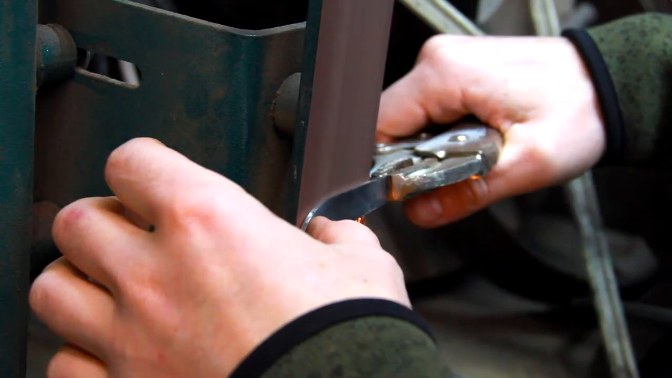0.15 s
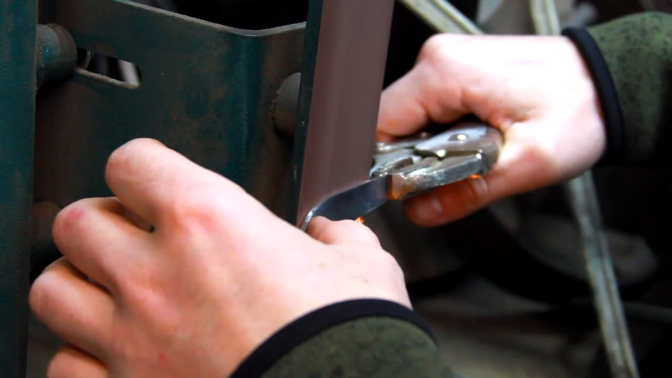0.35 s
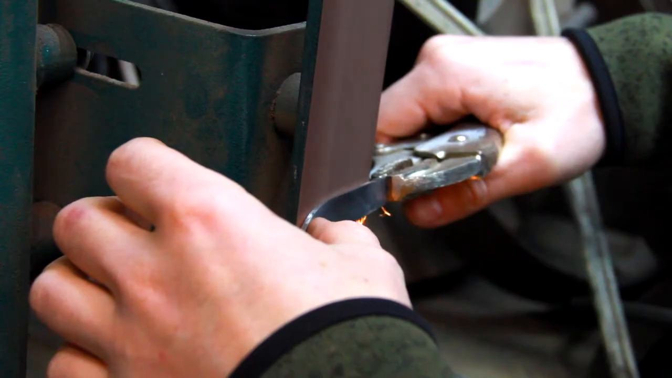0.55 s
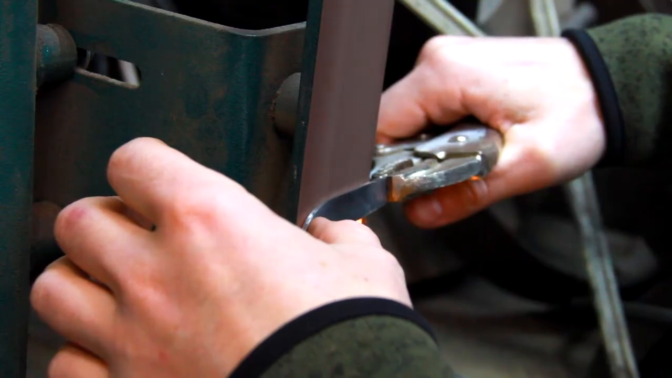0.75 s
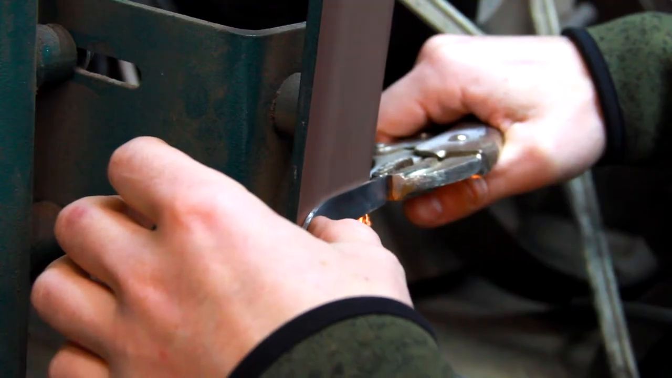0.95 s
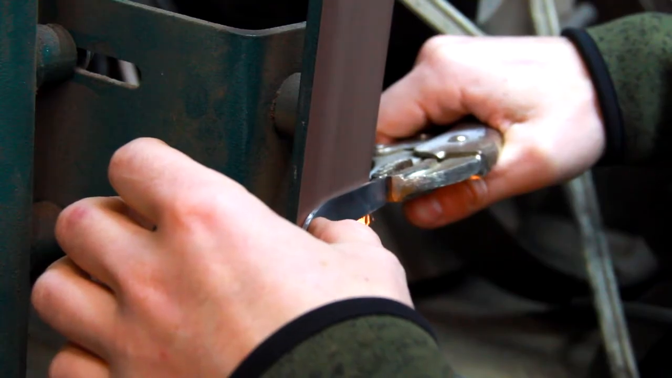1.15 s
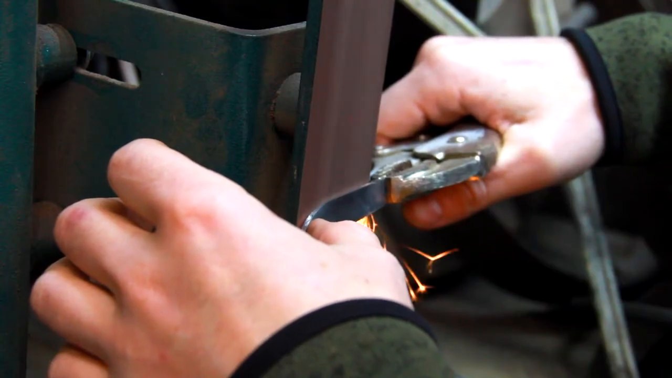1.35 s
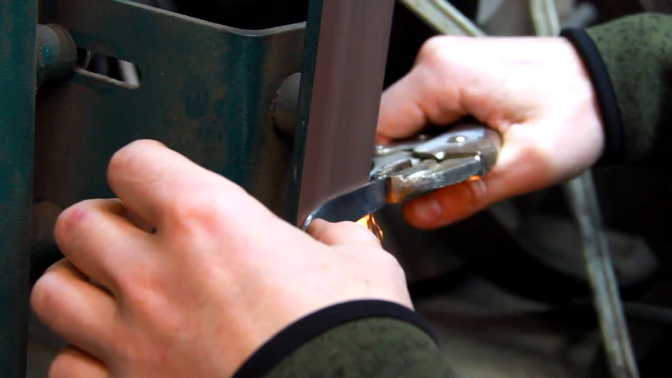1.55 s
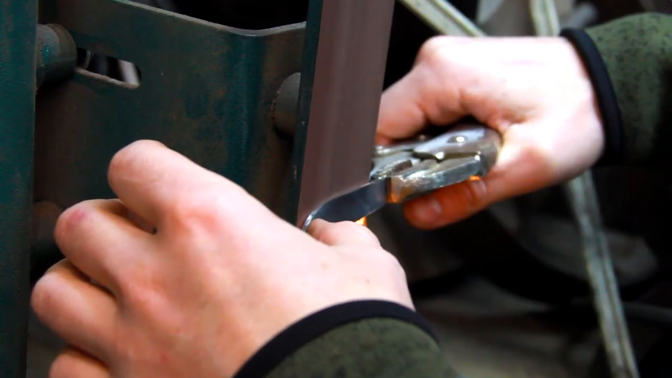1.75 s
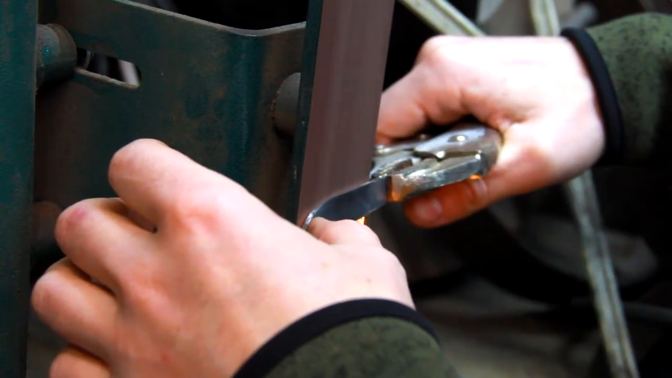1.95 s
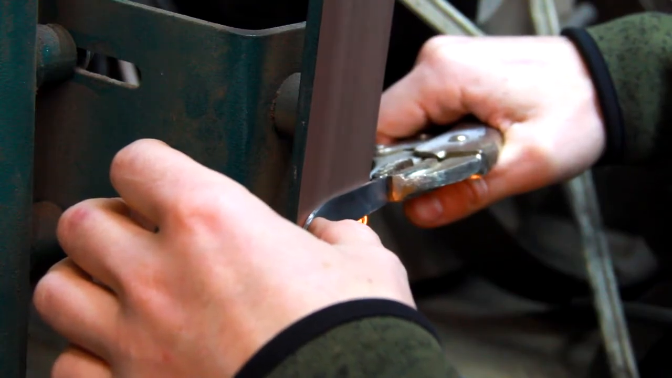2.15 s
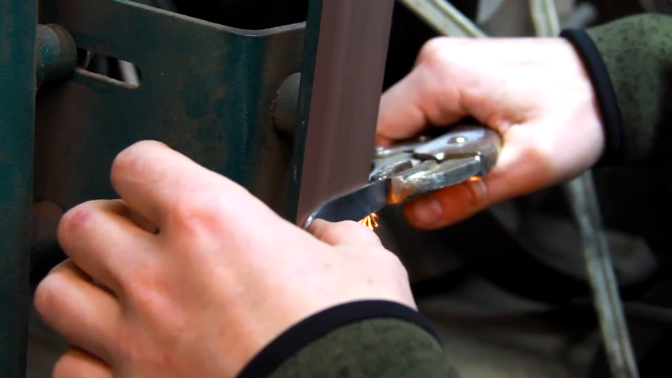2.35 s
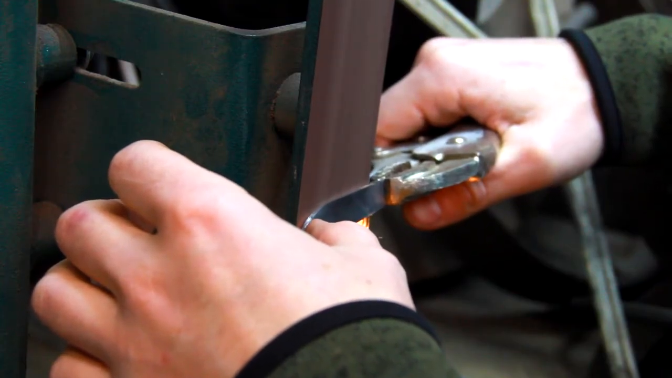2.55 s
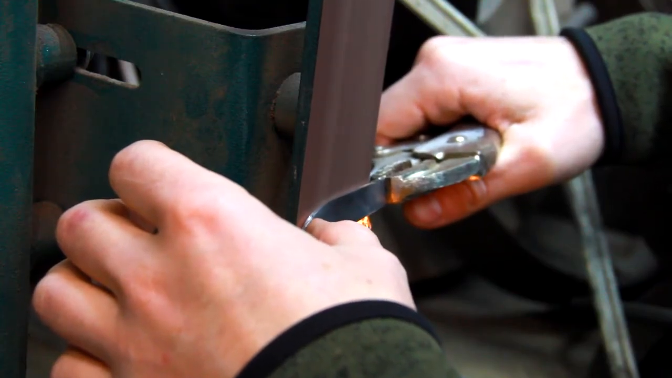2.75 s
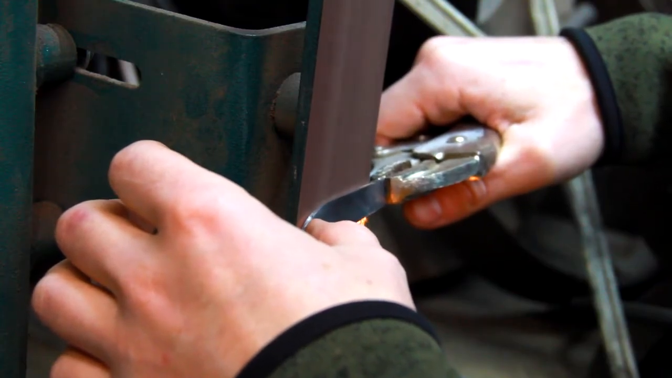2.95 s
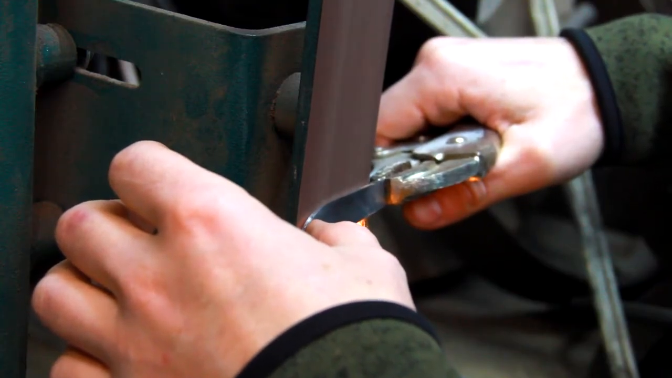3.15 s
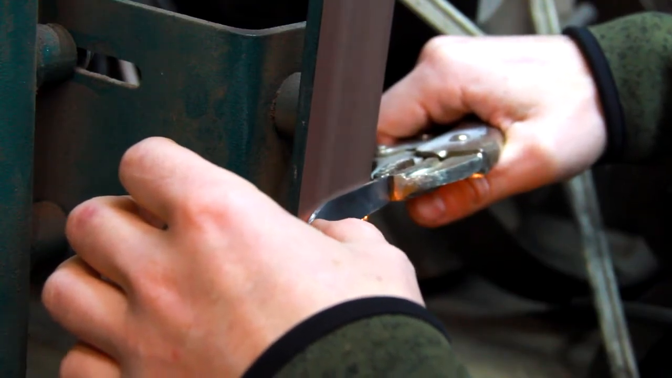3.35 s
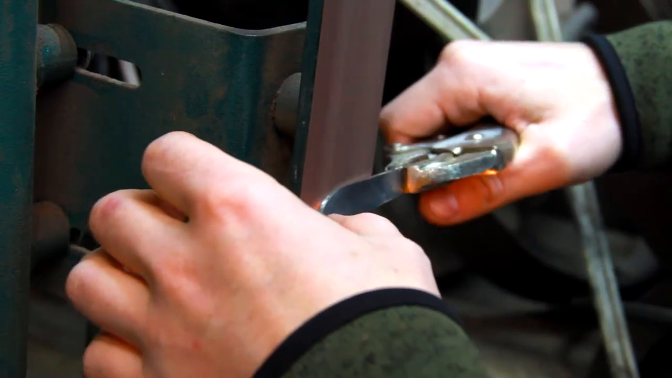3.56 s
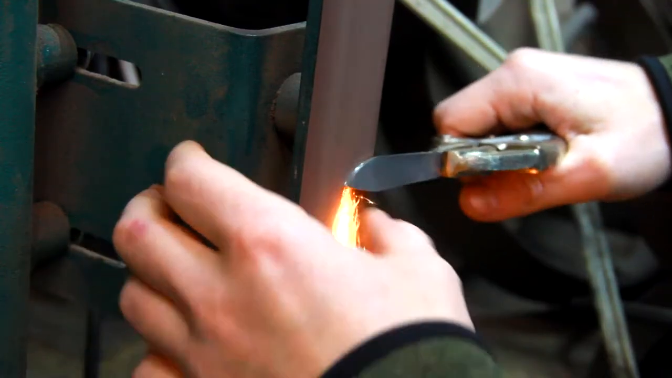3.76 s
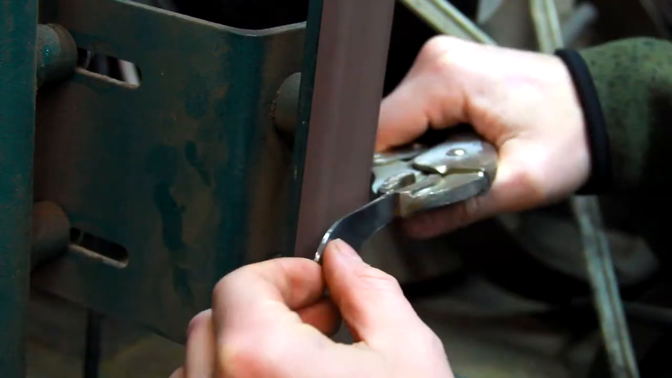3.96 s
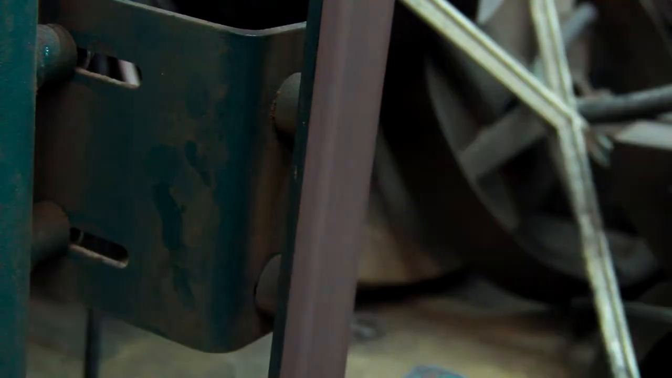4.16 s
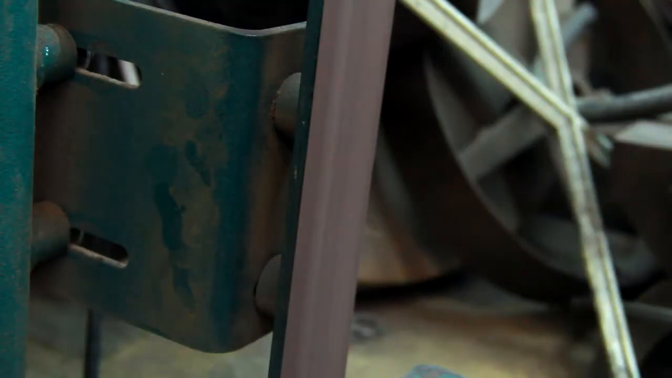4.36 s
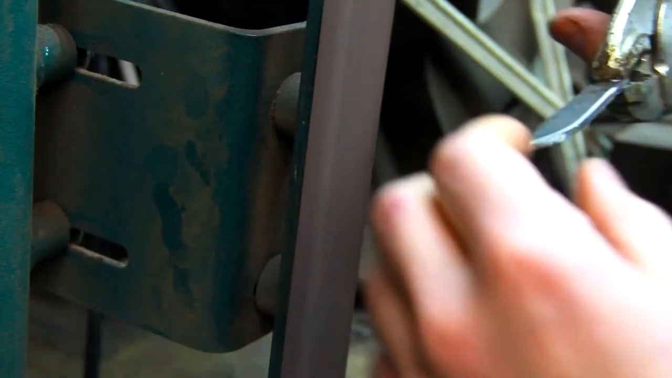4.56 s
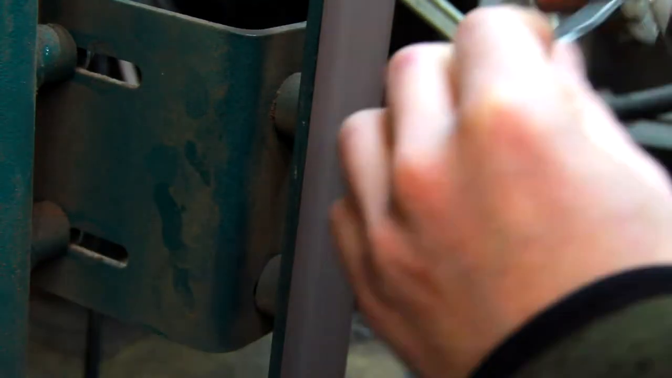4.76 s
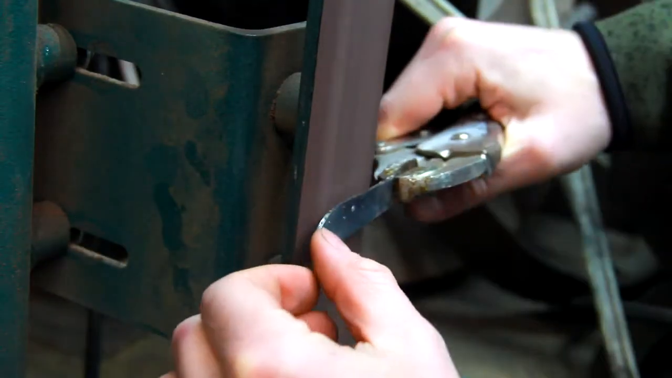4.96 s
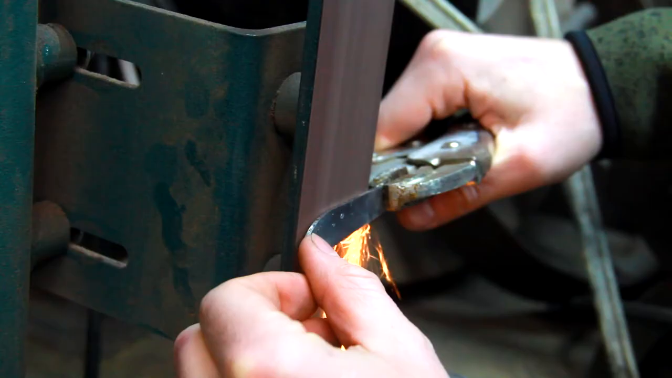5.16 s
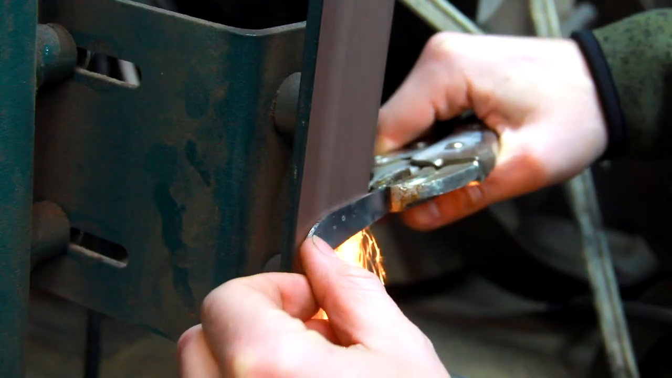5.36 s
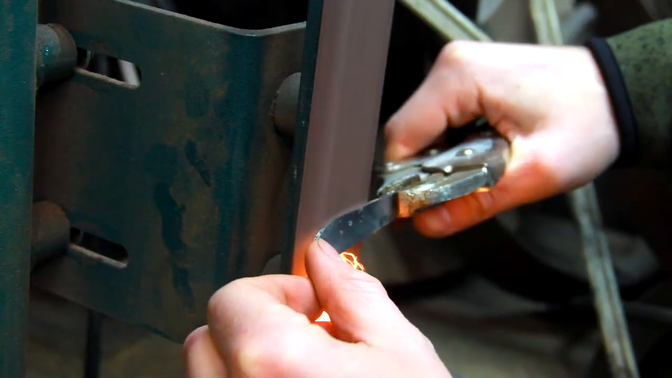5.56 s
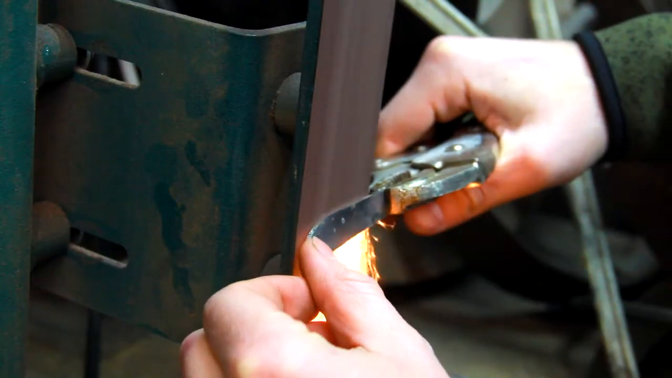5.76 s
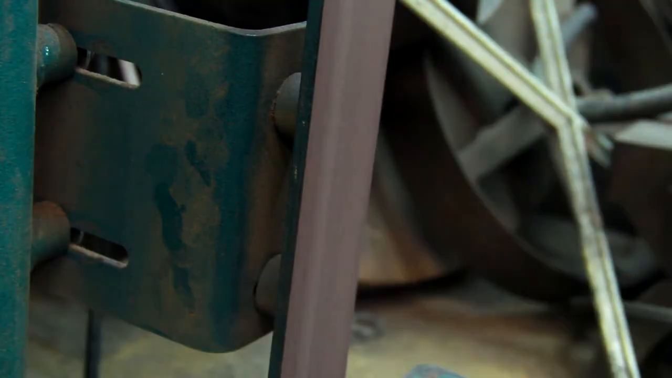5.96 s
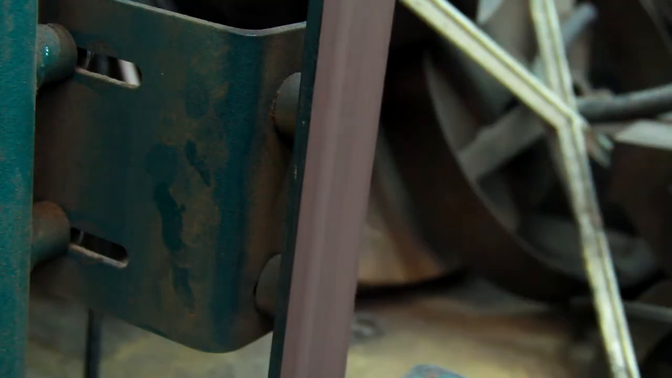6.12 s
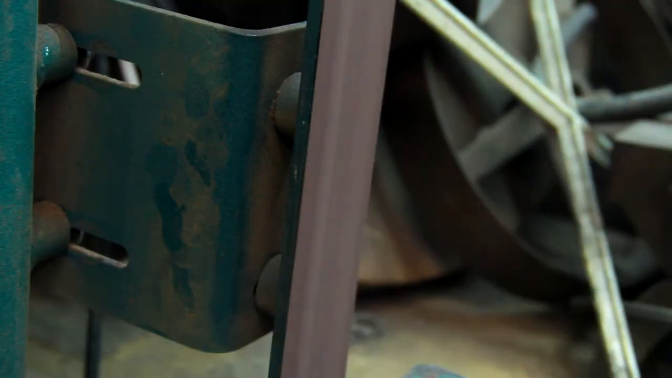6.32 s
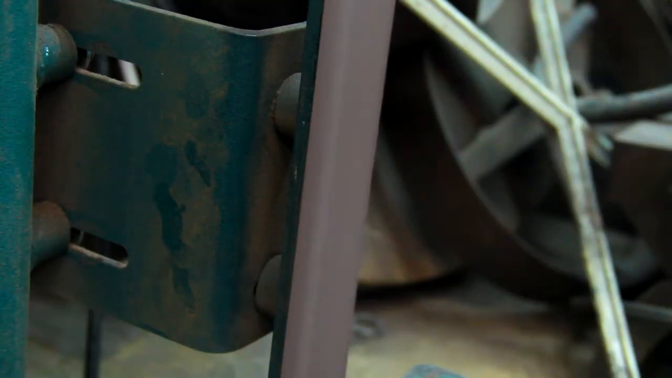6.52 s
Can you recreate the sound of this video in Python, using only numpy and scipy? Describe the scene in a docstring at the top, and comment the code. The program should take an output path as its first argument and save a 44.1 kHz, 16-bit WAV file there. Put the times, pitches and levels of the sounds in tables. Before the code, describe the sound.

A belt grinder runs under load, with low rumble, bright gritty hiss, metallic ringing and a clacking double knock at each belt lap. A hard cut turns it into a high whistle and harsh fused buzz. The buzz drops away when the blade leaves the belt, a tiny tick passes, then two firm presses follow. Close, dry, centred microphone.

```python
"""A small steel blade is ground on a belt grinder, close to the microphone. First, at natural speed, sine tones
make the motor's hum and whine, and shaped noise the frame's rumble, the grit's hiss and the ringing blade.
A double knock, noise in short pulses, returns each time the belt's splice passes under the blade.
Halfway, the sound jumps to fast-forward: the machine runs ten times faster, whistling and buzzing.
The blade is then lifted, a faint tick is heard while it is off the belt, and it is put back."""
import sys
import numpy as np
from scipy import signal
from scipy.fft import rfft, irfft
from scipy.io import wavfile

SR = 44100
rng = np.random.default_rng(int(sys.argv[2]) if len(sys.argv) > 2 else 0)


def store_pcm(level_fs):
    """Save levels as 16-bit WAV."""
    pcm = np.round(np.clip(level_fs, -1, 1) * 32767).astype(np.int16)
    wavfile.write(sys.argv[1], SR, np.atleast_2d(pcm).T)


N = 290619
TIME = np.arange(N) / SR  # seconds
BINS = np.fft.rfftfreq(N, 1 / SR) + 1e-3  # Hz, kept just above zero for the logarithm

# magnetic hum: (multiple of the mains frequency, level [dB])
HUM_LINES = [(1, -74.5), (2, -55.5), (4, -69), (6, -70), (8, -73)]
# fan, bearings and rotor slots: (multiple of the shaft rate, level before the whine trim [dB])
SHAFT_LINES = [(1, -101), (2, -82), (3, -73.5), (5, -66.5), (7, -80.5), (8, -69.5), (11, -69), (12, -70.5),
               (13, -69), (14, -79), (15, -72), (16, -71), (18, -79), (20, -82.5), (21, -72.5), (22, -71.5),
               (23, -72.5), (24, -76.5), (25, -73), (26, -75.5), (27, -71.5), (28, -65.5), (29, -74),
               (30, -77.5), (32, -73.5), (34, -63.5), (36, -75.5), (38, -63.5), (39, -70), (40, -73.5),
               (41, -83.5), (42, -75.5), (44, -74.5), (46, -78.5)]
# frame and idling belt: (frequency [Hz], level before the rumble trim [dB per Hz])
RUMBLE_SPECTRUM = [(10, -120), (38, -111), (52, -94), (72, -99), (92, -81.5), (110, -84.5), (140, -77.5),
                   (168, -82.5), (230, -75), (262, -80), (320, -73.5), (430, -87), (560, -90), (900, -89.5),
                   (1200, -88.5)]
# grit cutting steel: (frequency [Hz], relative level [dB])
GRIT_SPECTRUM = [(30, -63), (200, -14.5), (450, -9), (900, -14.5), (1200, -2), (1600, -19.5), (2400, -7.5),
                 (3200, 1), (4400, -4), (6500, -3.5), (7700, 0.5), (10500, -0.5), (13000, -5.5),
                 (15500, -10)]
# blade resonances: (frequency [Hz], width [Hz], relative level [dB])
BLADE_MODES = [(2065, 30, -0.5), (3070, 64, 3), (3114, 66, 7.5), (3264, 58, 7), (3415, 75, 1),
               (3635, 23, 3), (3880, 18, 4.5), (5253, 70, 7.5), (5384, 43, 7.5), (6020, 29, 9),
               (7220, 53, 4.5), (7700, 37, 4.5), (7900, 50, 2), (10700, 160, -4), (12500, 410, -4)]
# the platen behind the belt: (frequency [Hz], width [Hz], relative level [dB])
PLATEN_MODES = [(443, 14, -3), (487, 30, -3.5), (530, 9.8, 0), (630, 35, -14), (718.4, 12, 6),
                (823, 59, -6)]
# the pressed, damped blade as the splice knocks it: (frequency [Hz], width [Hz], relative level [dB])
KNOCK_MODES = [(700, 420, -10.5), (1222, 98, -3), (1648, 42.5, -0.5), (2049, 70, 3), (2415, 110, -2.5),
               (3004, 187, 6), (3744, 154, 1)]
# the edge scraping as it lands again: (frequency [Hz], width [Hz], relative level [dB])
SCRAPE_MODES = [(7900, 560, -2)]
# a faint tick: (time [s], decay [s], level before colouring [dB per Hz])
TICK_EVENT = (4.436, 0.01, -87.5)
# blows in each lap (leading end, trailing end, two bounces, a lump further along the belt):
# (lag at natural speed [s], relative knock level [dB], relative bright scrape level [dB])
LAP_BLOWS = [(0, 0, -9), (0.0083, 0.5, 1), (0.0142, -9, 1.5), (0.0193, -11, -1), (0.0678, -13.5, -28)]
# presses of the blade for the fast-forward: (start [s], end [s], edge pressure, tip pressure [1 = usual])
HAND_PRESSES = [(3.2, 3.579, 1.2, 0.96), (3.575, 3.858, .03, 0.84), (5.143, 5.596, 1.15, 0.76),
                (5.6, 5.745, .2, 0.65), (5.739, 5.885, 1.26, 0.86)]
# passes that catch the blade harder: (time [s], level above the usual [dB])
HARD_CATCHES = [(0.342, 0.3), (0.439, 1.5), (0.536, 2), (1.31, 2), (1.504, 1.5), (1.601, 2), (1.794, 1.5),
                (2.569, 2.5), (2.859, 1.5)]
# the blade's ring dips briefly: (time [s], half length [s], level change [dB])
RING_LEVEL_DIP = (1.55, 0.2, -1.5)

CUT_S = 3.272  # the jump to fast-forward
NORMAL, FAST = 1, 10  # playback speeds
# at natural speed: the unloaded shaft, the mains and the laps of the belt
SHAFT_HZ, MAINS_HZ, LAP_HZ = 29.78, 60, 10.328
SAG = 0.0055  # share of the shaft's speed lost at full load
FIRST_PASS_S = 0.0516  # the splice first comes round
# base strength of its knocks, their scatter, and the scatter of the belt's slip at natural speed
KNOCK_DB, KNOCK_SCATTER_DB, SLIP_S = -38, 1.0, 0.00059
LIFT_S, LIFT_SHARE = 0.005, 0.15  # time off the grit at natural speed, and share of the hiss lost
# natural speed: starting hiss, its growth, the blade's ring relative to it and the ring's waver
HISS_DB, HISS_GROWTH_DB_PER_S, RING_DB, RING_WAVER_DB = -81, 0.12, 1.35, 0.5
HAND_RAMP_S = 0.045  # the hand takes this long to change its pressure
IDLE_TAP = 0.08  # least splice pressure, left when the blade is lifted (1 = usual)
TOP_HZ = 15600  # top of the recorded range


def undb(db):
    """Turn decibels into gain."""
    return 10 ** (np.asarray(db) / 20)


def walk(rate):
    """Make a smooth random curve with spread 1 that changes about `rate` times a second."""
    curve = irfft(rfft(rng.standard_normal(N)) * np.exp(-(BINS / rate) ** 2), N)
    return curve / curve.std()


def noise(pace):
    """White noise with unit power per Hz of the machine's own time."""
    return rng.standard_normal(N) * np.sqrt(SR / 2 / pace)


def colour(sound, points, pace):
    """Shape a sound by a (frequency [Hz], level [dB]) spectrum; fast-forward moves it up."""
    hz, db = np.transpose(points)
    gain = undb(np.interp(np.log(BINS / pace), np.log(hz), db))
    return irfft(rfft(sound) * gain, N)


def ring(sound, modes, pace, radiate_hz=200):
    """Drive the resonances of a small part, which radiates little bass; fast-forward moves them up."""
    f = BINS / pace
    response = 0
    for k, (hz, width, db) in enumerate(modes):
        sign = (-1) ** k  # neighbouring resonances push opposite ways
        response = response + sign * undb(db) / (1 + 1j * (f * f - hz * hz) / (f * width))
    radiation = (f / (f - 1j * radiate_hz)) ** 2
    return irfft(rfft(sound) * response * radiation, N)


def tick():
    """A faint bright tick while the blade is off the belt: noise that starts at once and dies away."""
    start_s, decay_s, db = TICK_EVENT
    fade = (TIME > start_s) * np.exp(-np.abs(TIME - start_s) / decay_s)
    burst = noise(NORMAL) * undb(db) * fade
    return colour(burst, [(100, -70), (3800, 1), (9000, 2), (15000, -2)], NORMAL)


def frame(pace, rumble_db, flutter_db=1.0):
    """The running belt shakes the frame and pulleys, heard as fluttering low noise."""
    level = undb(rumble_db + flutter_db * walk(12 * pace))
    return colour(noise(pace) * level, RUMBLE_SPECTRUM, pace)


def motor(pace, load, whine_db=-0.5, strain_db=2.5, wobble=0.00059, flutter_db=3.0):
    """Steady mains hum and shaft tones; under load the shaft slows and the rotor whines harder."""
    load = np.clip(load, 0, 1)
    hum = 0
    for multiple, db in HUM_LINES:
        hum = hum + undb(db) * np.sin(2 * np.pi * (multiple * MAINS_HZ * pace * TIME + rng.random()))
    shaft_hz = SHAFT_HZ * pace * (1 - SAG * load + wobble * walk(3 * pace))
    turns = np.cumsum(shaft_hz) / SR
    flutters = [flutter_db * walk(2.3 * pace) for _ in range(7)]
    whine = 0
    for i, (multiple, db) in enumerate(SHAFT_LINES):
        # the rotor slots follow the load; the fan and bearing tones flutter
        is_slot = round(multiple) in (28, 34, 38)
        swing_db = strain_db * load if is_slot else flutters[i % len(flutters)]
        tone = np.sin(2 * np.pi * (round(multiple) * turns + rng.random()))
        whine = whine + undb(db + whine_db + swing_db) * tone
    return np.sqrt(2) * (hum + whine)  # so that the levels count as average (RMS) levels


def splice(pace, pressure, knock_db, scrape_db, thump_db, push_s=0.0011):
    """Once a lap the splice thumps the platen and knocks the blade, which bounces and scrapes as it lands."""
    lap_s = 1 / (LAP_HZ * pace)
    passes = np.arange(FIRST_PASS_S, TIME[-1], lap_s)
    age = np.arange(int(SR / LAP_HZ / pace)) / SR * pace  # the machine's own time since the pass
    push, scrape, thump = np.zeros((3, N + 2 * len(age)))
    chances = rng.standard_normal((len(passes), 1 + len(LAP_BLOWS)))
    for pass_s, (slip, *scatter) in zip(passes, chances):
        start = int((pass_s + SLIP_S * slip / pace) * SR)
        accent_db = sum(db for at, db in HARD_CATCHES if abs(at - pass_s) < 0.5 * lap_s)
        size = undb(KNOCK_DB + accent_db) * pressure[int(pass_s * SR)]
        thump[start] += size * SR / pace
        for (lag, db, bright_db), chance in zip(LAP_BLOWS, scatter):
            u = np.maximum(age - lag, 0) / push_s
            # quick rise, slower release
            blow = size * undb(KNOCK_SCATTER_DB * chance) * u * np.exp(1 - u)
            push[start:start + len(age)] += undb(db) * blow
            scrape[start:start + len(age)] += undb(bright_db) * blow
    knocks = undb(knock_db) * ring(push[:N] * noise(pace), KNOCK_MODES, pace)
    scrapes = undb(scrape_db) * ring(scrape[:N] * noise(pace), SCRAPE_MODES, pace)
    thumps = undb(thump_db) * ring(thump[:N], PLATEN_MODES, pace)
    return knocks + scrapes + thumps


def lift(pace):
    """Share of the grit's bite that is left as the blade rides over the splice."""
    age = (TIME - FIRST_PASS_S) * pace % (1 / LAP_HZ)
    return 1 - LIFT_SHARE * np.exp(-(2 * age / LIFT_S - 1) ** 4)


def pressures():
    """Edge and tip pressure: in each press the hand ramps up, holds and lets go."""
    edge, tip = 0, 0
    for start, end, on_edge, on_tip in HAND_PRESSES:
        held = np.clip(0.5 + np.minimum(TIME - start, end - TIME) / HAND_RAMP_S, 0, 1)
        edge = edge + on_edge * held
        tip = tip + on_tip * held
    return edge, tip


def belt_pattern(pace, bite_s, count):
    """High spots of the belt bite suddenly and fade, at the same places on every lap; spread 1."""
    laps = LAP_HZ * pace * TIME % 1
    around = np.linspace(0, 1, 1024)
    spots = 0
    for place, size in rng.random((count, 2)):
        spots = spots + size * np.exp(-((around - place) % 1) / LAP_HZ / bite_s)
    return np.interp(laps, around, (spots - spots.mean()) / spots.std())


def scratch(pace, patchy_db=1.22, grain_db=3.5, flicker_db=-0.43):
    """The force of passing grains: uneven noise, harder at the high spots of the belt."""
    grains = undb(grain_db * walk(2500 * pace))
    grains = grains / np.sqrt(np.mean(grains ** 2))
    patches = belt_pattern(pace, bite_s=0.003, count=40)
    return noise(pace) * grains * undb(patchy_db * patches + flicker_db * walk(10 * pace))


def grinding(pace, pressure, hiss_db, ring_db):
    """Grains hiss as they cut the steel, and their sideways push sets the blade ringing."""
    size = pressure * undb(hiss_db)
    hiss = colour(size * scratch(pace), GRIT_SPECTRUM, pace)
    ringing = ring(size * undb(ring_db) * scratch(pace), BLADE_MODES, pace)
    return hiss + ringing


def real_time():
    """The edge rests on the belt at natural speed and full load; the hiss slowly grows a little."""
    load = np.ones(N)
    dip_s, half_s, dip_db = RING_LEVEL_DIP
    dip = dip_db * np.exp(-((TIME - dip_s) / half_s) ** 2)
    ring_db = RING_DB + dip + RING_WAVER_DB * walk(9.9)
    hiss_db = HISS_DB + HISS_GROWTH_DB_PER_S * TIME
    machine = motor(NORMAL, load) + frame(NORMAL, rumble_db=0)
    knocks = splice(NORMAL, load, knock_db=-32.0, scrape_db=-34, thump_db=-55.0)
    steel = grinding(NORMAL, lift(NORMAL), hiss_db=hiss_db, ring_db=ring_db)
    return machine + knocks + steel


def fast_forward():
    """At tenfold speed the hum turns into a whistle and the splice knocks fuse into a buzz."""
    edge, tip = pressures()
    machine = motor(FAST, edge) + frame(FAST, rumble_db=-0.5)
    tapped = np.maximum(edge, IDLE_TAP)
    knocks = splice(FAST, tapped, knock_db=-35.5, scrape_db=-36, thump_db=-57.0)
    steel = grinding(FAST, tip, hiss_db=-79.5, ring_db=-10)
    return machine + knocks + steel


def scene():
    """A hard cut from natural speed to fast-forward; one microphone feeds both channels."""
    mono = np.where(TIME < CUT_S, real_time(), fast_forward() + tick())
    return np.array([mono, mono])


def record(dry):
    """The recorder cuts the top of the treble steeply."""
    top_cut = signal.ellip(12, 0.1, 70, TOP_HZ, fs=SR, output="sos")
    return signal.sosfilt(top_cut, dry)


dry = scene()
out = record(dry)
store_pcm(out)
```